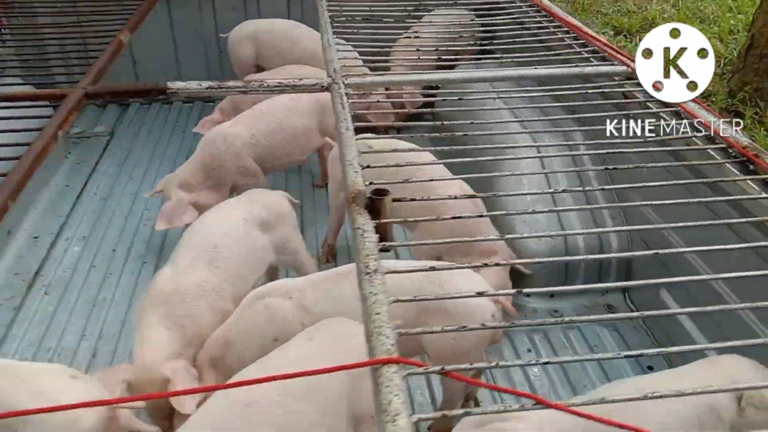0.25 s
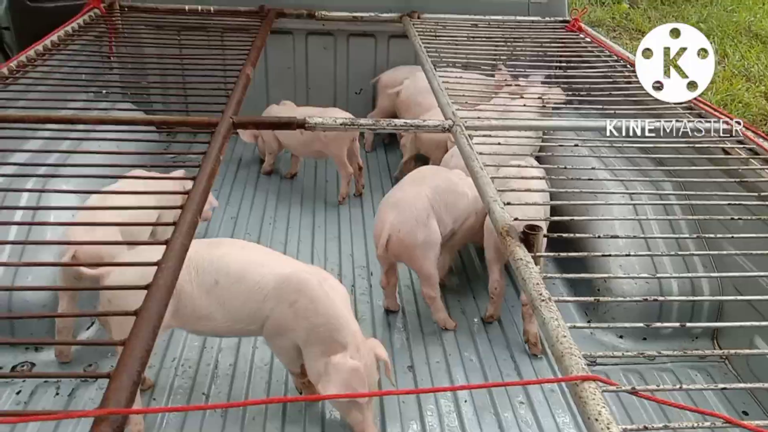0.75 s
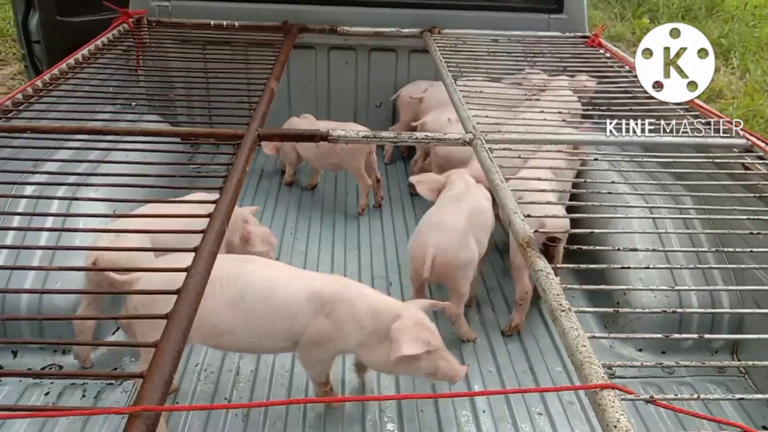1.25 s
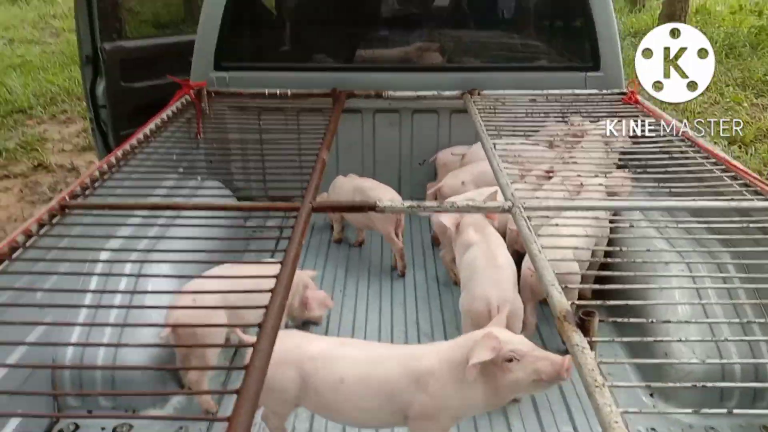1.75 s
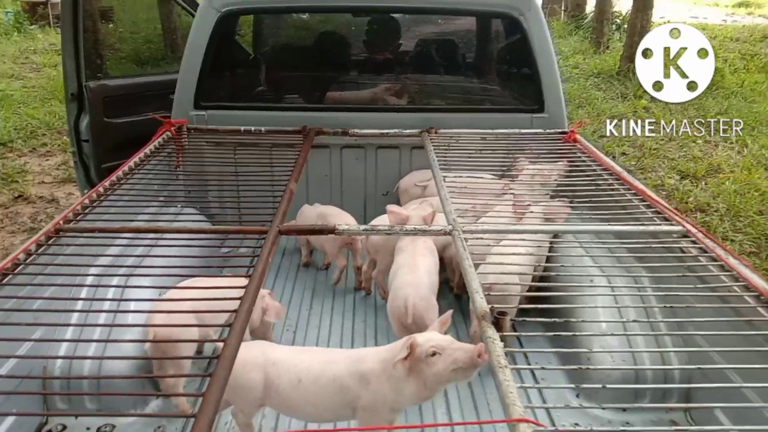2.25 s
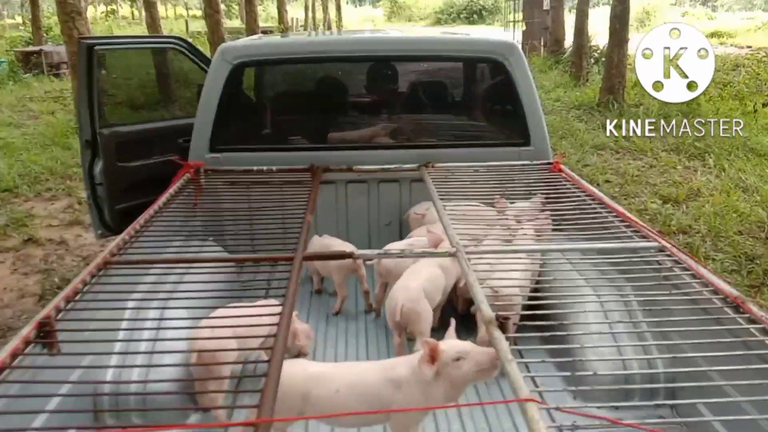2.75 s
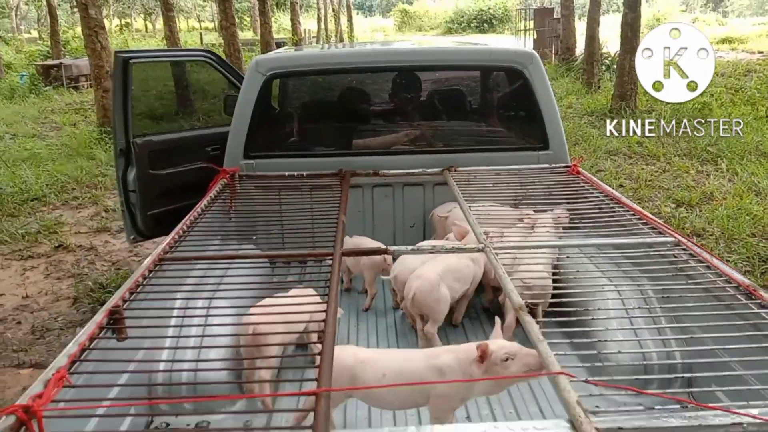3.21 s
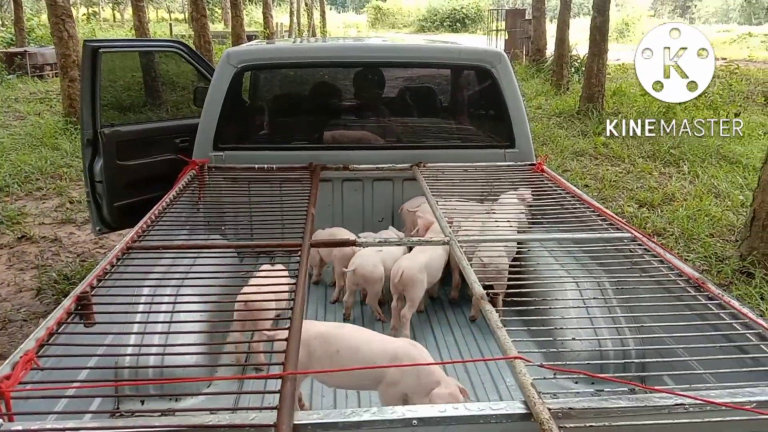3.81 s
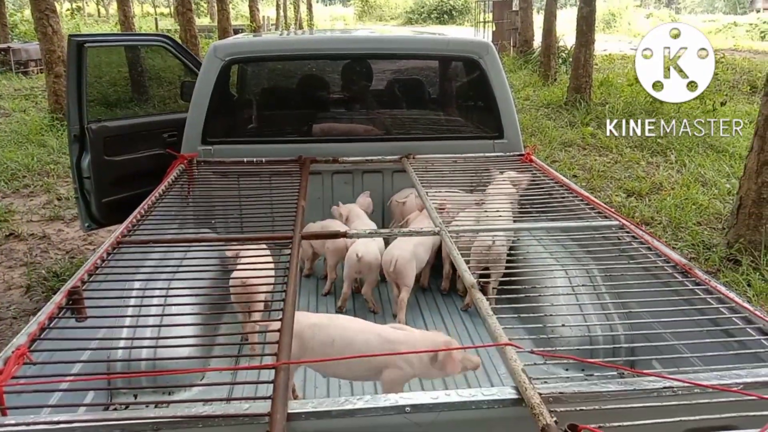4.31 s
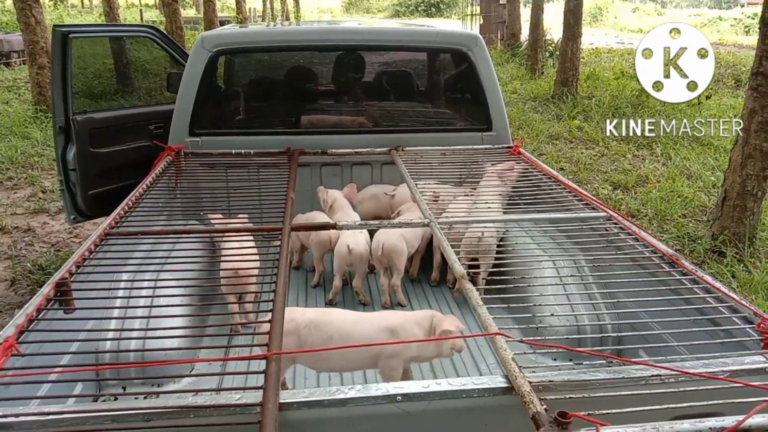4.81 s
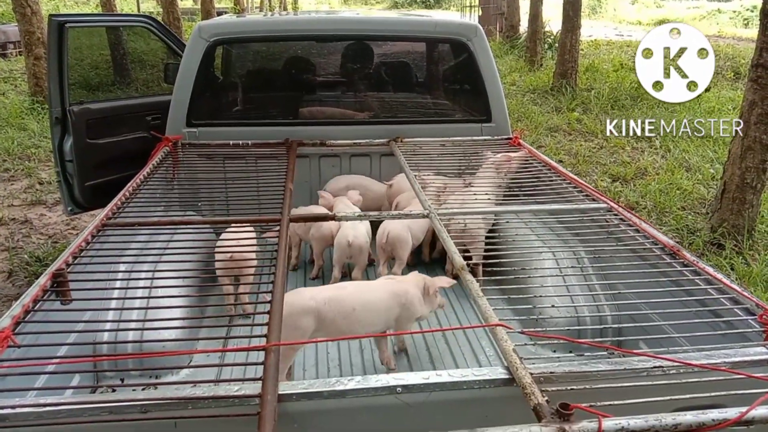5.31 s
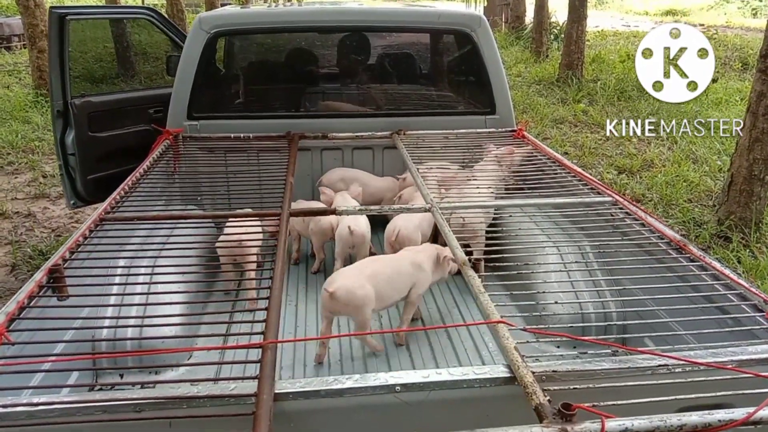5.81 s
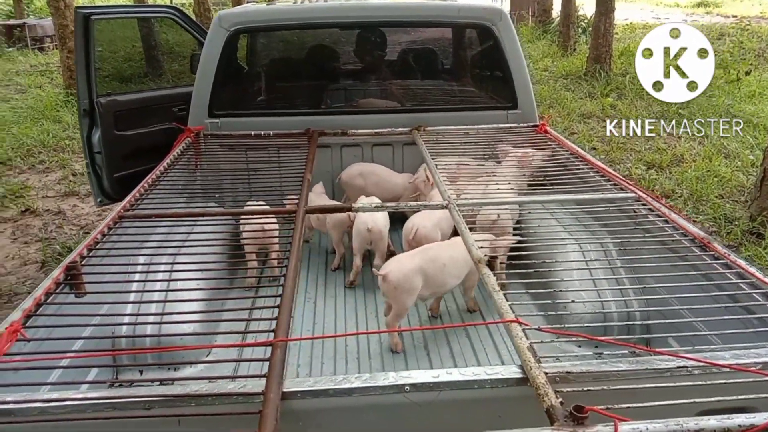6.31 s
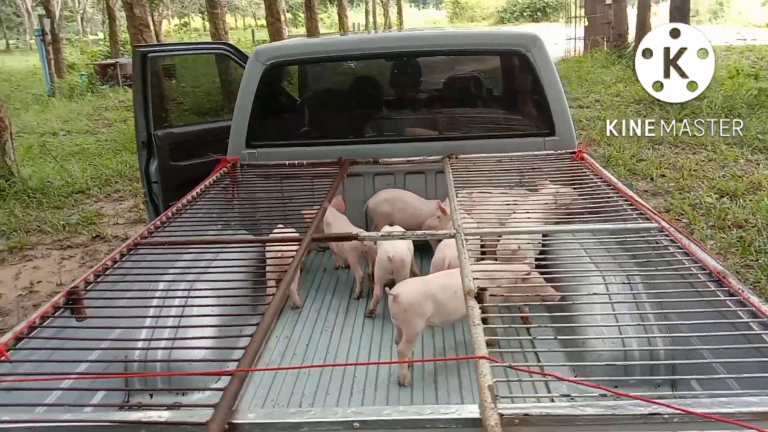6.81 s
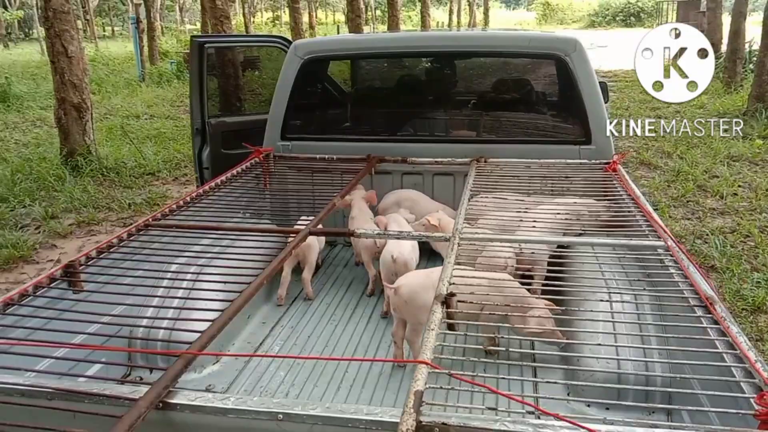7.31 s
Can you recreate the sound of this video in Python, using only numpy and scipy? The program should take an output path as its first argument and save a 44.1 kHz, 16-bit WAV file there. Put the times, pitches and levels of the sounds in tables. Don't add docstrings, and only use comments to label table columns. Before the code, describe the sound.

Close behind a pickup's tailgate outdoors, piglets move on ribbed sheet steel. Light hoof taps and soft thuds come first, with a tiny insect chirp and a short rising whine. Sharp bangs follow around one and a half and three seconds, then scattered clicks and scuffs, a small grunt and a reedy squeak. Leaves and insect hiss stay very faint, ducking between sounds.

```python
import sys
import numpy as np
from scipy import signal
from scipy.fft import rfft, irfft
from scipy.io import wavfile
from scipy.ndimage import uniform_filter1d

SR = 44100
rng = np.random.default_rng(int(sys.argv[2]) if len(sys.argv) > 2 else 0)


def level_to_linear(level):
    exponent = np.asarray(level, float) / 20
    return 10 ** exponent


def bounce(signal):
    frames = np.transpose(np.atleast_2d(signal))
    limited = np.clip(frames, -1, 1)
    pcm = np.round(limited * 32767).astype(np.int16)
    wavfile.write(sys.argv[1], SR, pcm)


N = 332955
BINS = np.arange(8193) * SR / 16384
AGE = np.arange(16384) / SR

# time in seconds, scuff level in dB, panel rumble in dB, air in dB.
SHUFFLE = [(0.0, -58.5, -62.5, -70), (1.07, -56.5, -54.5, -79.5), (1.62, -54.5, -48.5, -79),
           (2.14, -60.5, -60, -76.5), (3.93, -62, -62.5, -81.5), (4.44, -60, -63.5, -79),
           (5.11, -58, -61, -82.5), (5.95, -62.5, -58.5, -77), (6.14, -59.5, -55.5, -82),
           (7.04, -61, -65, -75.5), (7.55, -58.5, -58, -71)]
# frequency in Hz, level in dB per Hz.
AIR = [(5000, -1), (7200, 4), (8300, -12), (9700, 7.5), (11200, 5), (12000, -6), (14100, 1), (15300, 9.5)]


def rms_one(x):
    return x / np.sqrt(np.mean(x ** 2) + 1e-20)


def in_time(rows):
    s, *columns = np.transpose(rows)
    return [np.interp(np.arange(N) / SR, s, c) for c in columns]


def at_hz(points, hz):
    points_hz, points_db = np.transpose(points)
    return np.interp(np.log(hz), np.log(points_hz), points_db)


def drift(rate):
    knots = rng.standard_normal(400)
    return np.interp(np.arange(N) / SR * min(rate, 50), np.arange(400), knots) * 1.2


def add(out, s, sound):
    i = max(round(s * SR), 0)
    out[i:i + len(sound)] += sound[:N - i]


def grains():
    uneven_db = 3.3 * np.minimum(rng.exponential(1, (2, N)), 4)
    return rng.standard_normal((2, N)) * level_to_linear(uneven_db)


def coloured(source, spectrum, patchy_db, rate, count=4):
    out, together = 0, drift(rate)
    lowest_hz, highest_hz = spectrum[0][0], min(spectrum[-1][0], 16500)
    octaves = np.log2(highest_hz / lowest_hz)
    edges = lowest_hz * 2 ** np.arange(0, octaves + 1 / count, 1 / count)
    for k, (low, high) in enumerate(zip(edges, edges[1:])):
        sections = signal.butter(2, [low, high], "band", fs=SR, output="sos")
        band = signal.sosfilt(sections, source[k % 2])
        flicker_db = patchy_db * (together + drift(rate))
        out = out + band * level_to_linear(at_hz(spectrum, np.sqrt(low * high)) + flicker_db)
    return rms_one(out)


def resonance(x, hz, width):
    r = np.exp(-np.pi * width / SR)
    feedback = [1, -2 * r * np.cos(2 * np.pi * hz / SR), r * r]
    return signal.lfilter([(1 - r * r) / 2, 0, (r * r - 1) / 2], feedback, x)


def mode_bank(hz, width):
    return 1 / (1 + 2j * (BINS - np.asarray(hz)[:, None]) / width)


def passband(low_hz, high_hz):
    sections = signal.butter(4, [low_hz, min(high_hz, 19000)], "band", fs=SR, output="sos")
    return signal.sosfreqz(sections, BINS, fs=SR)[1]


def strike(bank, shape_db, spread_db, rise_s, t60, level_db):
    luck = rng.standard_normal((2, len(shape_db)))
    rise_s, t60 = max(rise_s, .001), np.clip(t60, .015, .45)
    fall = level_to_linear(-14 * (4.95 * abs(AGE - rise_s) / t60) ** 0.75)
    force = np.where(AGE < rise_s, (AGE / rise_s) ** 0.82, fall)
    fade_out = np.clip((.26 - AGE) / .05, 0, 1)
    force = force * rng.standard_normal(len(AGE)) * fade_out
    shares = level_to_linear(np.add(shape_db, spread_db * luck[0])) * np.sign(luck[1])
    sound = irfft(rfft(force) * (shares @ bank))
    top = np.sqrt(np.max(uniform_filter1d(sound ** 2, size=400)))
    return level_to_linear(level_db) * sound / top


def voice(rows, partials, wobble, rough_db):
    hz, db = in_time(rows)
    t = np.arange(N) / SR
    gate = np.clip(np.minimum(t - rows[0][0], rows[-1][0] - t) / 0.00094, 0, 1)
    turns = 2 * np.pi * np.cumsum(hz * (1 + wobble * drift(45))) / SR
    tone = 0
    for k, level_db in partials:
        tone = tone + level_to_linear(level_db + rough_db * drift(40)) * np.sin(round(k) * turns)
    return np.sqrt(2) * gate * level_to_linear(db) * tone


def air():
    # frequency in Hz, level in dB per Hz.
    leaf_spectrum = [(3600, -6), (4500, 0), (6000, -2), (7000, -16)]
    air_db = in_time(SHUFFLE)[2]
    hiss = coloured(grains(), AIR, patchy_db=2.2, rate=4, count=13)
    leaves = coloured(grains(), leaf_spectrum, patchy_db=1.5, rate=8.0)
    return level_to_linear(air_db) * (hiss + level_to_linear(1.5) * leaves)


def steady_tones():
    # time in seconds, pitch in Hz, level in dB.
    chirps = [
        [(.256, 10900, -81), (.275, 13300, -66), (.295, 13900, -64), (.315, 13200, -64), (.337, 10900, -69)],
    ]
    # time in seconds, pitch in Hz, level in dB.
    whistle = [
        (2.3, 15014, -96),
        (7.2, 15014, -96),
    ]
    return sum(voice(rows, [(1, 0)], wobble=.0003, rough_db=2) for rows in chirps + [whistle])


def shuffle():
    # frequency in Hz, level in dB per Hz.
    scuff_spectrum = [(470, -42), (800, 1), (1060, -23), (1310, 4), (3600, 6), (4320, -8), (5770, -2.5),
                      (8400, -65)]
    # frequency in Hz, level in dB per Hz.
    rumble_spectrum = [(25, -26), (43, -15), (145, 2), (335, -3.5), (717, -7.5), (1100, -13), (1430, -14),
                       (2420, -120)]
    scuff_db, rumble_db, _ = in_time(SHUFFLE)
    friction = grains()
    scuff = coloured(friction, scuff_spectrum, patchy_db=3.0, rate=30, count=6)
    cluster = rms_one(resonance(friction[0], hz=1286, width=83))
    scuff = rms_one(scuff + level_to_linear(-8) * cluster)
    rumble = coloured(rng.standard_normal((2, N)), rumble_spectrum, patchy_db=1.8, rate=20)
    return level_to_linear(scuff_db) * scuff + level_to_linear(rumble_db) * rumble


def piglet_calls():
    # time in seconds, pitch in Hz, level in dB (of the fifth partial near enough).
    whine = [
        (.31, 328, -67),
        (.36, 349, -64),
        (.392, 355, -61),
        (.41, 356, -70),
        (.43, 361, -57),
        (.5, 378, -55),
        (.55, 398, -68),
    ]
    # multiple of the pitch, level in dB.
    whine_partials = [(1, -14), (2, -7), (3, -11), (5, 1.5), (10, -21)]
    # time in seconds, pitch in Hz, level in dB.
    groan = [
        (.515, 401, -63),
        (.56, 425, -54),
        (.605, 478, -68),
    ]
    # time in seconds, pitch in Hz, level in dB.
    squeaks = [
        [(4.805, 1510, -69), (4.825, 1470, -45), (4.885, 1376, -52)],
        [(4.805, 1176, -61), (4.87, 1256, -40.5), (4.92, 1330, -58)],
        [(3.997, 230, -58), (4.014, 222, -52), (4.065, 267, -54)],
        [(4.085, 1260, -53), (4.155, 1255, -56), (4.165, 1235, -66)],
    ]
    calls = voice(whine, whine_partials, wobble=.005, rough_db=2.5)
    calls += voice(groan, [(1, -2), (2, 0.0)], wobble=0.018, rough_db=5.5)
    calls += voice(squeaks[0], [(1, 0), (2, -12)], wobble=.03, rough_db=4)
    for rows in squeaks[1:]:
        calls += voice(rows, [(1, 0)], wobble=.025, rough_db=4)
    return calls


def loads():
    # start in seconds, peak rms in dB,
    # upper panel modes in dB re peak, strongest frequency in Hz.
    booms = [(.572, -44, -10, 127), (.76, -50, 1, 389), (1.24, -50, -3, 418), (1.3665, -23, -10, 297),
             (1.434, -40.5, -0.5, 157), (1.5398, -44.5, 4.5, 608), (2.413, -38.5, -10, 430),
             (4.06, -40.5, -23, 290), (4.8738, -57, -31, 201), (.61, -49, -12, 310),
             (7.022, -46, -10.5, 290), (7.257, -45.5, 1, 592), (7.504, -46, -21, 320)]
    # start in seconds, peak rms in dB,
    # upper modes in dB re peak, strongest frequency in Hz.
    bumps = [(3.036, -31.5, -1.5, 290), (3.09, -40, -1.5, 600), (4.997, -46, -7, 222), (2.3, -50, -20, 95),
             (3.25, -52, -20, 80), (3.69, -52, -12, 85), (1.46, -38, -1.5, 300), (.479, -41, -8, 480),
             (.528, -45, -6, 490), (6.59, -56.5, -2, 195), (6.715, -66, -24, 198), (6.79, -58, -8, 150),
             (5.34, -57.5, -9, 178), (5.41, -53.5, -2, 157), (2.08, -65.5, -16, 150),
             (4.66, -61.5, -11, 200), (3.35, -60.5, -8, 138), (0.0, -49, -11, 129),
             (.2255, -47.5, -8.5, 130), (.719, -46, -7.5, 124), (1.748, -39.5, -11, 114),
             (1.81, -40, -16, 231), (1.973, -49, -15, 219), (2.9, -51.5, -23, 145), (3.53, -53, -15, 98),
             (4.146, -49, -11, 591), (5.134, -44.5, -15, 199), (5.549, -53, -14, 337),
             (6.075, -37, -5, 213), (6.301, -51, -33, 214), (6.364, -53, -6, 149), (.385, -73, -23, 95),
             (7.3456, -47, -4, 103)]
    # start in seconds, peak rms in dB, swell in seconds,
    # upper modes in dB re peak, strongest frequency in Hz.
    leans = [(0.1147, -56, 0.1, 4, 417), (1.065, -46, 0.14, 1, 492), (1.615, -36.5, 0.11, -6.5, 396),
             (1.705, -37.5, 0.098, -3, 482), (2.238, -45, 0.11, -16, 224), (3.2076, -41.5, 0.048, -22, 313),
             (3.53, -55.5, .05, -0.5, 604), (3.6149, -50.5, 0.11, -1.5, 394),
             (3.8002, -35.5, 0.042, -8.5, 554), (5.0792, -48.5, 0.06, 1, 209),
             (5.8773, -53.5, 0.083, -10, 223), (6.2119, -47, 0.075, -26, 227),
             (6.459, -53, 0.064, -27, 106), (7.4113, -35.5, 0.03, -7, 128)]
    lean_t60_s = 0.3
    rows = [(s, db, swell_s, lean_t60_s, re_db, hz) for s, db, swell_s, re_db, hz in leans]
    for table, rise_s, t60 in [(booms, 0.022, 0.47), (bumps, 0.014, 0.27)]:
        rows += [(s, db, rise_s, t60, re_db, hz) for s, db, re_db, hz in table]
    return rows


def thumps():
    # frequency in Hz, level in dB.
    panel_modes = [(130, 2), (166, -3.5), (216, -1), (250, -12), (290, 1), (350, -1), (408, 3), (480, -11)]
    # frequency in Hz, level in dB.
    upper_modes = [(530, 3), (590, 0.5), (655, -0.5), (717, 5), (790, 3), (860, -10.5), (962, -6)]
    out = np.zeros(N)
    panel_hz, panel_db = np.transpose(panel_modes)
    upper_hz, upper_db = np.transpose(upper_modes)
    low = passband(66, 1200)
    panels = mode_bank(panel_hz, width=21.7) * low
    upper = mode_bank(upper_hz, width=46) * passband(356, 2180)
    springs = passband(48, 110)[None]
    for s, db, rise_s, t60, upper_re_db, hz in loads():
        nearest = mode_bank([hz], width=5 / t60) * low
        near_db = panel_db - 5 * np.abs(np.log2(panel_hz / hz))
        add(out, s, strike(springs, [0], 0, 0.99 * rise_s, 0.5 * t60, db - 22.5))
        add(out, s, strike(nearest, [0], 0, 0.655 * rise_s, 0.37 * t60, db - 0.5))
        add(out, s, strike(panels, near_db, 4, 0.54 * rise_s, 0.76 * t60, db - 5))
        add(out, s, strike(upper, upper_db, 4.2, 0.744 * rise_s, 0.64 * t60, db + upper_re_db + 2.5))
    return out


def snaps():
    # start in seconds, peak level in dB, centre frequency in Hz.
    grit = [(0.578, -35, 1610), (1.3762, -17, 2950), (0.8018, -33, 2300), (1.846, -41, 3200),
            (2.0787, -36.5, 1220), (3.706, -39, 3320), (4.056, -28, 3350), (5.0564, -44, 2830),
            (6.0294, -41, 3380), (6.3737, -40, 1250), (6.5158, -45, 2630), (6.589, -39, 2030),
            (6.59, -47, 720), (6.65, -51.5, 450), (6.66, -53.5, 447), (6.8018, -45, 790),
            (6.466, -50, 4000), (0.398, -55, 1500), (1.983, -35, 3380), (1.6615, -33, 3140),
            (3.574, -47, 4500), (6.373, -51, 12500), (6.7685, -47, 4830), (6.769, -53, 11500),
            (7.212, -38.5, 1220)]
    out = np.zeros(N)
    for s, db, hz in grit:
        spike = rng.standard_normal(600) * np.exp(-np.arange(600) / 10)
        sound = resonance(resonance(spike, hz, width=0.44 * hz), hz, width=0.44 * hz)
        add(out, s, level_to_linear(db) * sound / np.max(np.abs(sound)))
    return out


def ticks():
    # start in seconds, peak rms in dB, fall t60 in seconds,
    # part above 8 kHz in dB re peak.
    contacts = [(0.7507, -46.5, 0.16, -18), (1.372, -39.5, .082, -13.5), (1.6196, -50, .051, -22),
                (1.842, -54.5, 0.19, -12), (1.9795, -46, 0.12, -17), (2.3027, -42.5, 0.13, -27),
                (2.6402, -42, 0.12, -13), (3.041, -36.5, 0.082, -28), (3.801, -35, 0.17, -20),
                (4.06, -51, 0.098, -20), (5.108, -58, 0.44, -16), (.0, -52, .15, -24),
                (.148, -53, .15, -24), (.228, -55, .2, -18), (6.124, -50, .12, -20),
                (5.352, -46, 0.055, -24), (5.723, -59, 0.038, -15), (7.017, -54, 0.079, -23),
                (7.261, -56, 0.16, -13), (7.346, -50, 0.61, -18), (7.415, -46.5, 0.16, -6)]
    # frequency in Hz, level in dB per Hz.
    edge_spectrum = [(4300, -12), (5080, 1), (6080, -5), (6590, -10), (8200, -29)]
    out, rise_s = np.zeros(N), 0.0095
    edge_hz, top_hz = np.linspace(4350, 8000, num=16), np.linspace(8000, 15600, num=20)
    edge = mode_bank(edge_hz + 70 * rng.standard_normal(16), width=103) * passband(4400, 7830)
    top = mode_bank(top_hz, width=800) * passband(7000, 17000)
    edge_db, top_db = at_hz(edge_spectrum, edge_hz), 0.86 * at_hz(AIR, top_hz)
    for s, db, t60, top_re_db in contacts:
        add(out, s, strike(edge, edge_db, 5, .7 * rise_s, .9 * t60, db))
        add(out, s, strike(top, top_db, 0.88, 0.6 * rise_s, 1.0 * t60, db + top_re_db - 2.5))
    return out


def footfalls():
    # start in seconds, peak rms in dB,
    # fall t60 in seconds, 1.25 kHz cluster in dB re peak, brightest frequency in Hz.
    stamps = [(6.123, -33, .14, -18, 3300), (0.0, -37, 0.12, -13, 1834), (1.372, -24, 0.11, 2, 3050),
              (1.6598, -30.5, 0.16, -3.5, 3246), (1.981, -31.5, 0.096, -38, 3280),
              (3.0385, -29, 0.048, -7, 2960), (3.042, -22.5, 0.097, -5.5, 2490),
              (3.058, -30.5, 0.22, -6.5, 2890), (4.053, -31, 0.11, -9.5, 3340),
              (4.068, -41, 0.16, 5.5, 3020), (5.284, -35.5, 0.1, -19, 3470),
              (1.543, -33.5, 0.083, -4.5, 3456), (5.3466, -34, 0.12, -12.5, 2730)]
    # start in seconds, rms in dB, swell in seconds,
    # brightest frequency in Hz.
    skids = [(0.14, -42, 0.022, 1850), (1.597, -44.5, 0.034, 3380), (1.738, -40.5, 0.026, 3200),
             (2.616, -45, 0.01, 3140), (2.634, -39.5, 0.0082, 3900), (3.207, -49, 0.017, 3550),
             (3.5892, -43.5, 0.091, 3500), (5.122, -36.5, 0.014, 3530), (5.471, -50.5, 0.018, 1940),
             (7.404, -40.5, 0.038, 2580), (7.5005, -43.5, 0.027, 2380)]
    # start in seconds, rms in dB, cluster in dB re peak, brightest frequency in Hz.
    tips = [(.066, -47.5, -14, 1790), (.7505, -36, -6, 2790), (1.1023, -36, -2.5, 3550),
            (1.1423, -44.5, -15, 3050), (1.1787, -40.5, -24, 3380), (1.2426, -50, -4, 2520),
            (2.904, -43, -5, 2645), (2.947, -45.5, -4, 3120), (5.188, -50, -20, 3120),
            (5.824, -39.5, -18, 3370), (5.9138, -39, -14.5, 2560), (6.2919, -52, -1.5, 2580),
            (7.013, -37.5, -8, 2430), (2.411, -36, 0, 1960), (5.875, -40, -21, 3500),
            (7.2565, -36.5, -0.5, 2594)]
    steps = [(.219, -43, -7, 1990), (.8846, -48, -11, 2560), (1.5075, -50.5, 4, 3100),
             (2.4785, -50, 0, 3770), (3.427, -48.5, -5, 3260), (3.534, -47, -4, 3650),
             (3.799, -28.5, -3.5, 3410), (3.806, -27, -5, 2150), (4.148, -46, -11, 2450),
             (5.3, -47.5, 2, 3000), (5.547, -51.5, -11, 3580), (5.671, -48.5, -4, 2930),
             (5.9792, -44.5, -10, 2350), (6.398, -51, -2, 2280), (7.215, -51.5, -12, 3080),
             (7.345, -40, -6, 3170)]
    drags = [(.571, -50.5, 3.5, 1810), (1.279, -42.5, -23, 3410), (1.335, -45, -6, 3600),
             (1.619, -40.5, -6, 2280), (1.842, -45, -8, 3220), (1.878, -41.5, -9.5, 3620),
             (3.235, -46, -24, 3270), (5.101, -36.5, -10, 3820), (5.408, -50, -8, 2460),
             (5.444, -44.5, -5, 2310), (1.915, -42.5, -37, 3570), (2.234, -49.5, -5, 1900),
             (2.301, -41, -5.5, 2550), (3.346, -47, -6, 2410), (3.902, -43.5, -34, 2850),
             (4.334, -51, -1, 3850), (4.453, -49.5, -6, 1455), (4.668, -44, -16, 3680),
             (4.784, -51, 3.5, 3010), (5.623, -49.5, -24, 3200), (5.724, -39, -11, 3090),
             (6.058, -45, -12, 3290), (6.17, -48, -15, 3500), (6.775, -51.5, -11, 3580)]
    patter = [(.118, -50.5, -5, 1575), (.604, -57.5, 9, 1490), (.69, -53, -11, 3440),
              (.92, -56.5, -9, 2530), (1.078, -60.5, -13, 3280), (2.14, -64, 1.5, 1660),
              (2.55, -59, -4, 2950), (2.793, -61, -4, 2470), (3.938, -49.5, -19, 3440),
              (4.005, -57.5, -1, 2580), (4.41, -54, -1, 2540), (4.54, -59, -2, 3000),
              (5.004, -53.5, -7, 2800), (5.056, -58, -9, 3030), (6.2, -57, -6, 2930), (6.55, -56, -5, 2170),
              (6.595, -58.5, -2, 2030), (6.719, -56, -13, 2100), (6.82, -53, -10, 2760),
              (6.905, -54.5, -6, 2060), (7.135, -58, -6, 1790)]
    stamp_rise_s, skid_t60_s, skid_cluster_db = 0.0019, 0.14, -7.5
    rows = [(s, db, stamp_rise_s, t60, re_db, hz) for s, db, t60, re_db, hz in stamps]
    rows += [(s, db, swell_s, skid_t60_s, skid_cluster_db, hz) for s, db, swell_s, hz in skids]
    kinds = [(tips, 0.009, 0.13), (steps, 0.016, 0.14), (drags, 0.0074, 0.25), (patter, 0.0037, 0.14)]
    for table, rise_s, t60 in kinds:
        rows += [(s, db, rise_s, t60, re_db, hz) for s, db, re_db, hz in table]
    return rows


def taps():
    # frequency in Hz, level in dB per Hz.
    sheet_spectrum = [(1450, -5), (1610, -9), (2470, -5), (3400, -3.5), (4630, -16.5), (5400, -8.5)]
    # frequency in Hz, level in dB.
    cluster_modes = [(1190, -2.5), (1246, 4), (1305, 2.5), (1390, -8)]
    out = np.zeros(N)
    sheet_hz = np.linspace(1480, 5300, num=40) + 40 * rng.standard_normal(40)
    cluster_hz, cluster_db = np.transpose(cluster_modes)
    sheet = mode_bank(sheet_hz, width=69) * passband(1600, 5000)
    cluster = mode_bank(cluster_hz, width=38.5) * passband(845, 1780)
    wide = passband(590, 5160)[None]
    for s, db, rise_s, t60, cluster_re_db, hz in footfalls():
        soft = np.clip(-(db + 9) / 20, 0, 1)
        nearness = np.exp(-(np.log2(sheet_hz / hz) / 0.42) ** 2)
        near_db = at_hz(sheet_spectrum, sheet_hz) + 6 * soft * nearness
        rib = mode_bank([hz], width=96) ** 2
        add(out, s, strike(wide, [0], 0, 0.67 * rise_s, 0.84 * t60, db - 14))
        add(out, s, strike(sheet, near_db, 4.15, 0.81 * rise_s, 1.06 * t60, db - 2.26))
        add(out, s, strike(rib, [0], 0, 0.93 * rise_s, 0.74 * t60, db - 14.0 + 8 * soft))
        add(out, s, strike(cluster, cluster_db, 2.2, 1.08 * rise_s, 1.09 * t60, db + cluster_re_db - .1))
    return out


def scene():
    background = air() + steady_tones() + shuffle()
    return (background + piglet_calls() + thumps() + snaps() + ticks() + taps())[None]


def top_cut(x):
    return signal.sosfilt(signal.butter(12, 16370, fs=SR, output="sos"), x)


def record(dry):
    level_db = 10 * np.log10(uniform_filter1d(dry ** 2, size=900) + 1e-12)
    duck = uniform_filter1d(level_to_linear(0.58 * np.clip(level_db + 50, -30, 0)), size=300)
    low_pass = signal.cheby2(18, 50, 15850, fs=SR, output="sos")
    return top_cut(signal.sosfilt(low_pass, dry * duck))


dry = scene()
out = record(dry)
bounce(out)
```